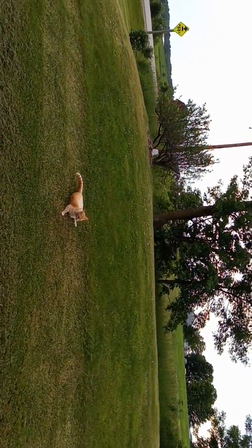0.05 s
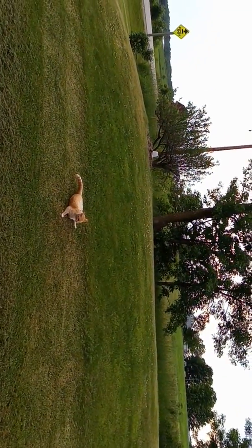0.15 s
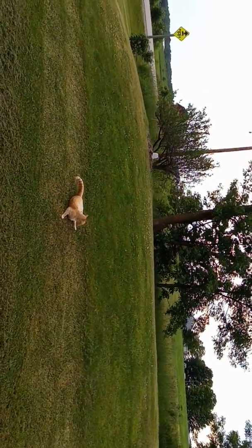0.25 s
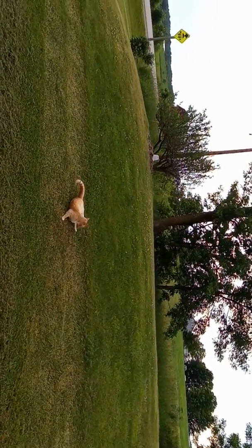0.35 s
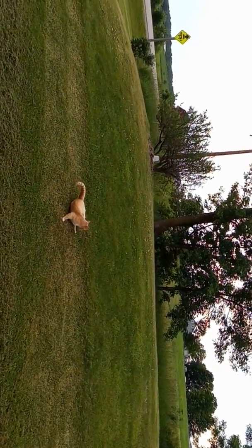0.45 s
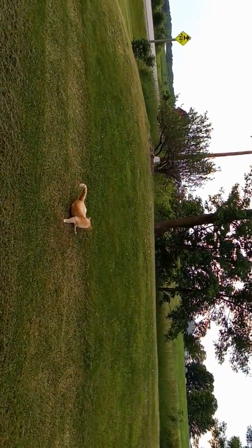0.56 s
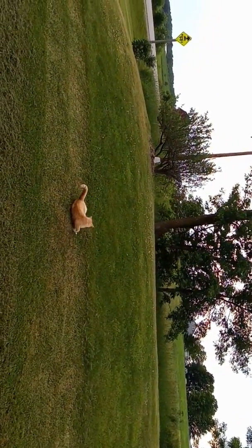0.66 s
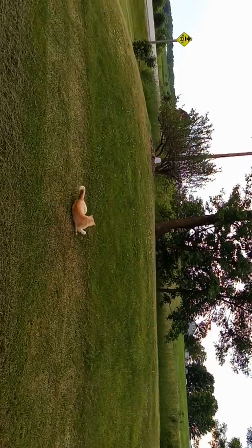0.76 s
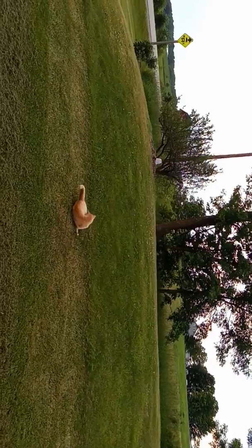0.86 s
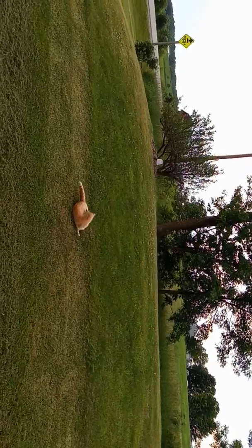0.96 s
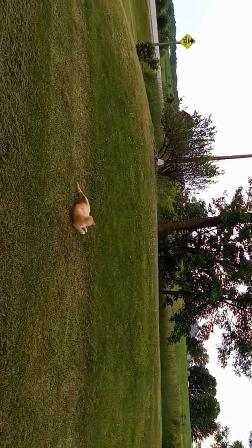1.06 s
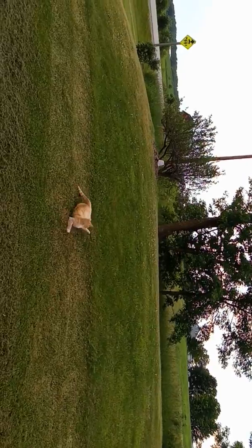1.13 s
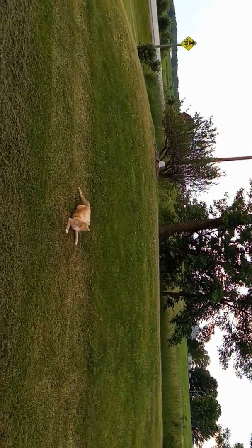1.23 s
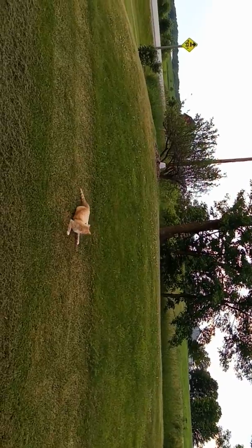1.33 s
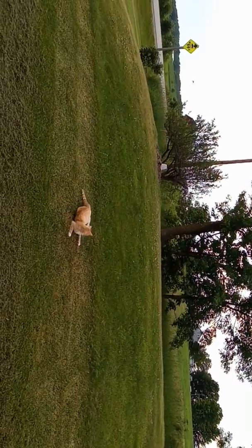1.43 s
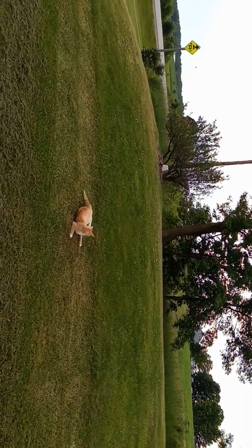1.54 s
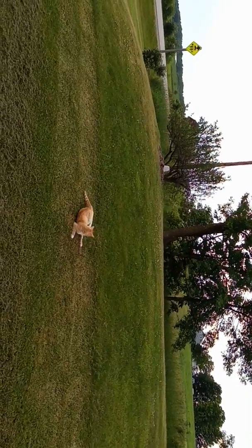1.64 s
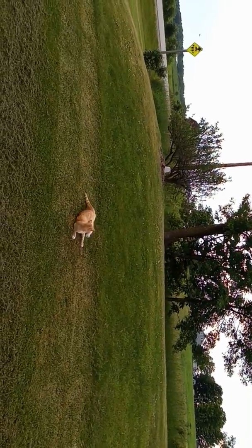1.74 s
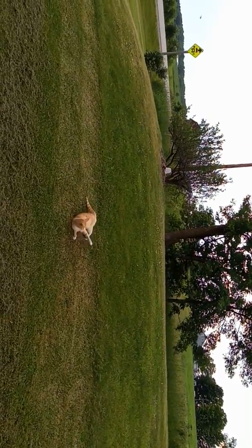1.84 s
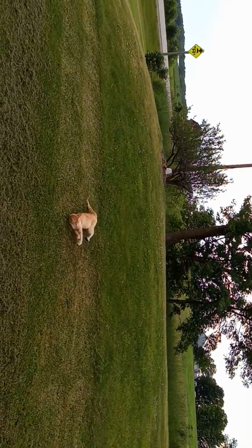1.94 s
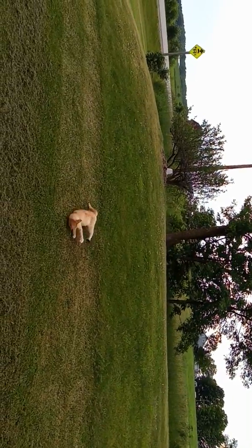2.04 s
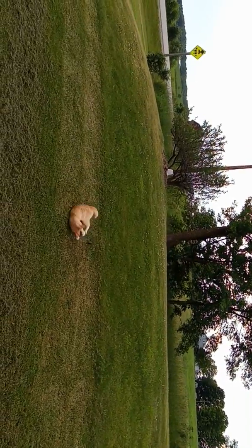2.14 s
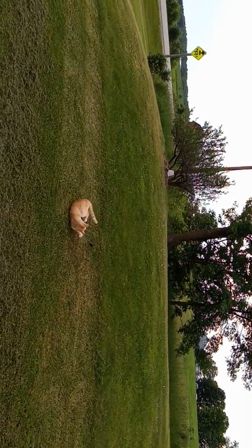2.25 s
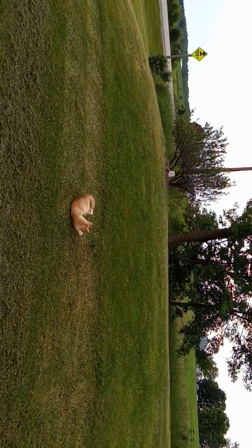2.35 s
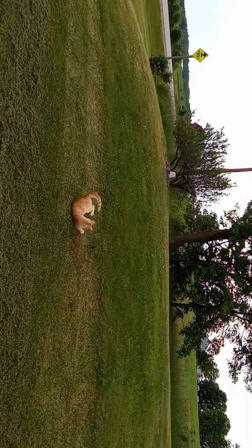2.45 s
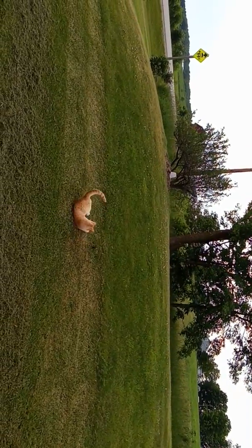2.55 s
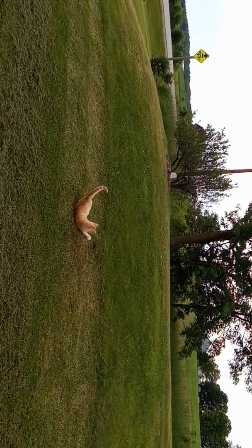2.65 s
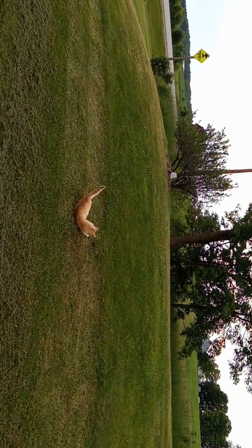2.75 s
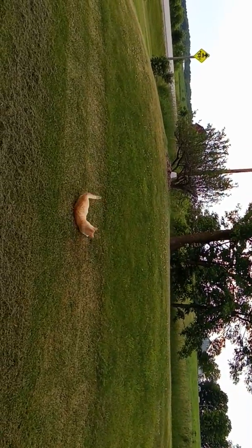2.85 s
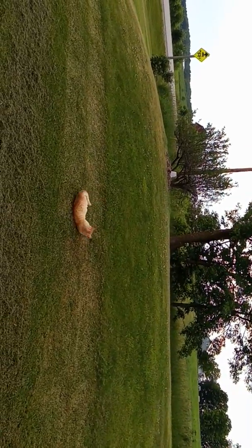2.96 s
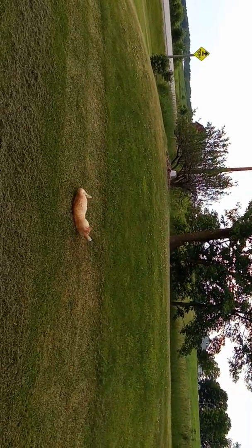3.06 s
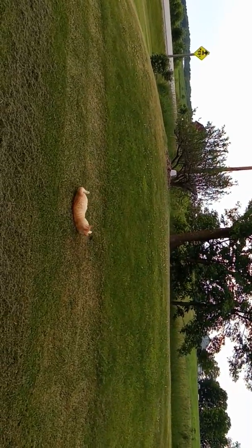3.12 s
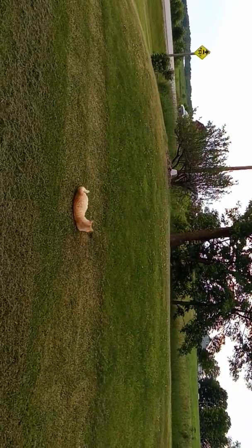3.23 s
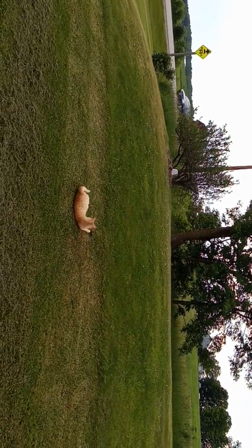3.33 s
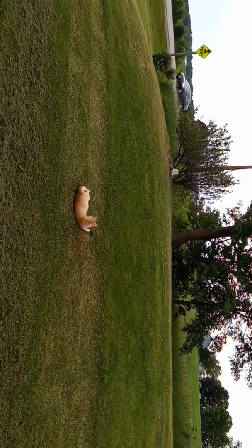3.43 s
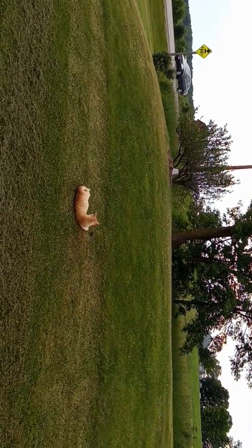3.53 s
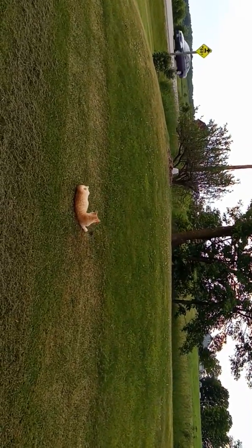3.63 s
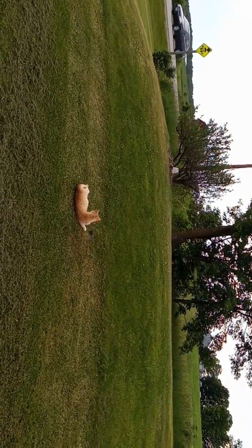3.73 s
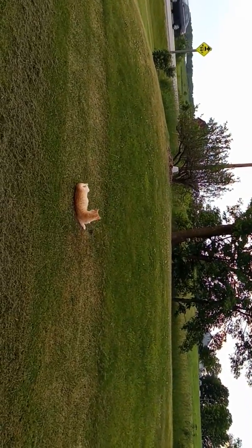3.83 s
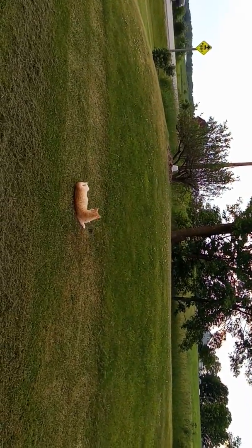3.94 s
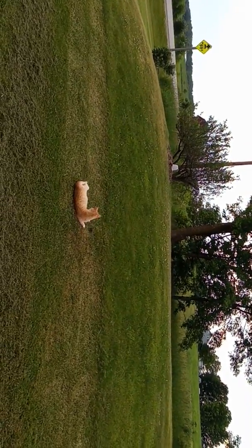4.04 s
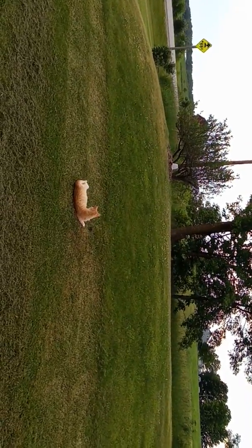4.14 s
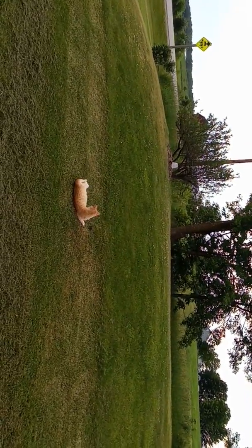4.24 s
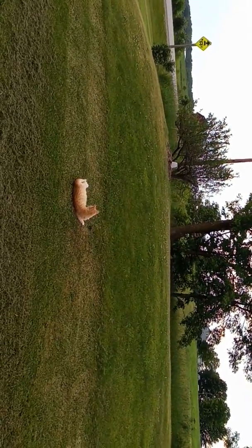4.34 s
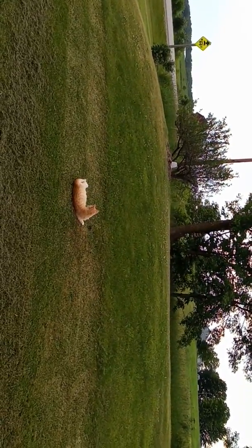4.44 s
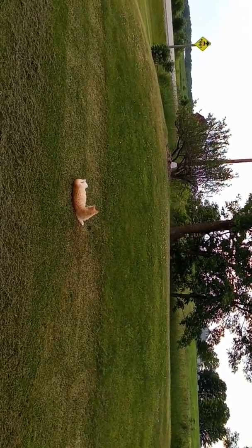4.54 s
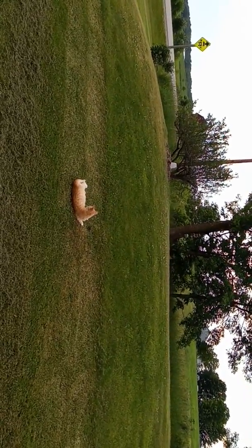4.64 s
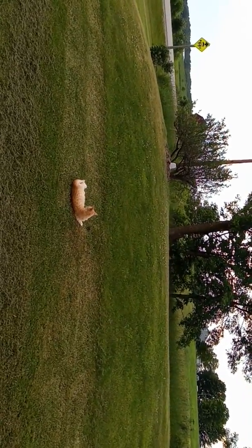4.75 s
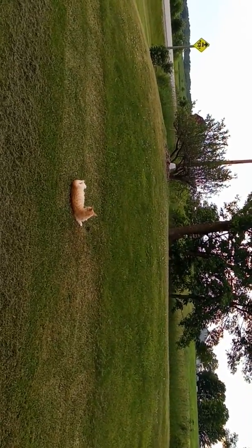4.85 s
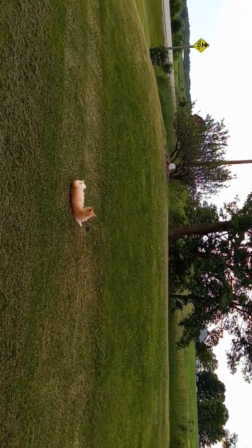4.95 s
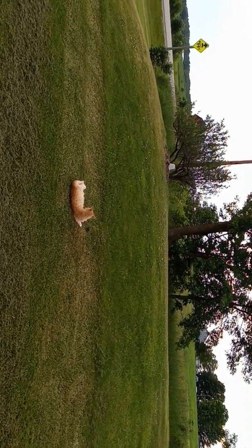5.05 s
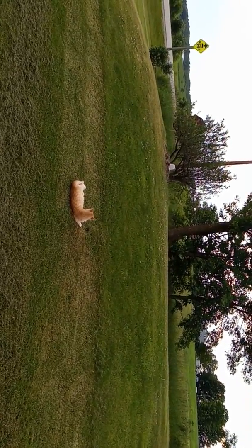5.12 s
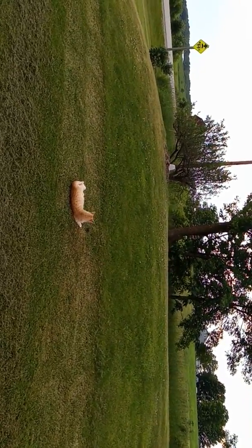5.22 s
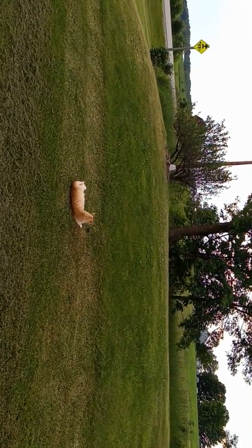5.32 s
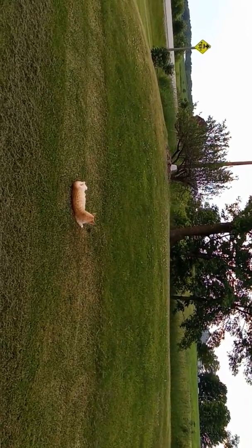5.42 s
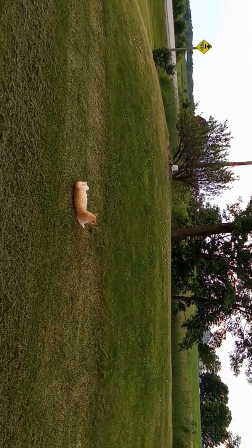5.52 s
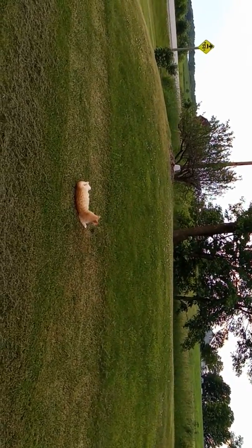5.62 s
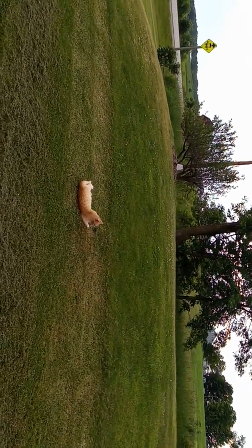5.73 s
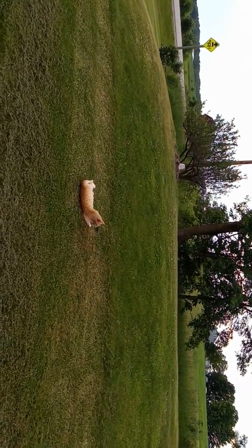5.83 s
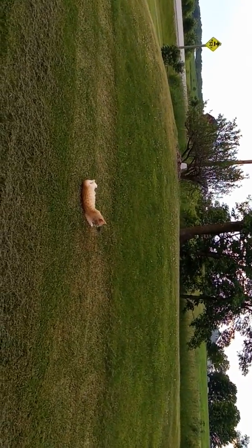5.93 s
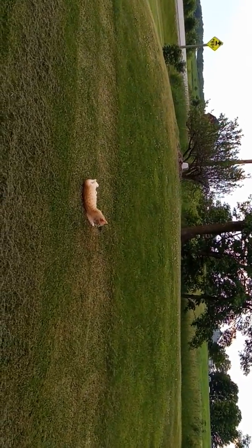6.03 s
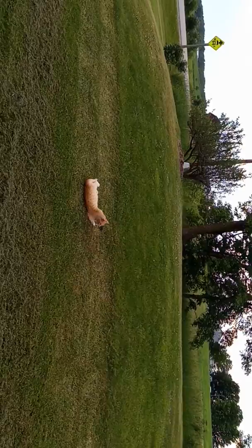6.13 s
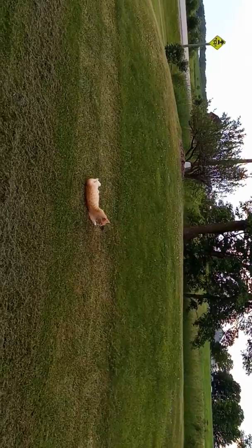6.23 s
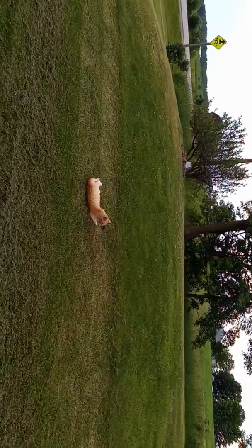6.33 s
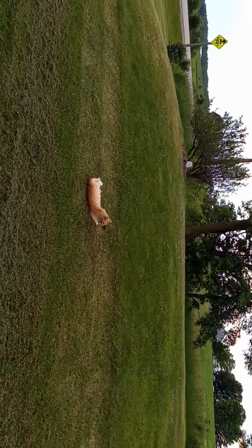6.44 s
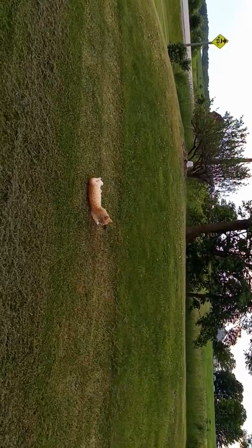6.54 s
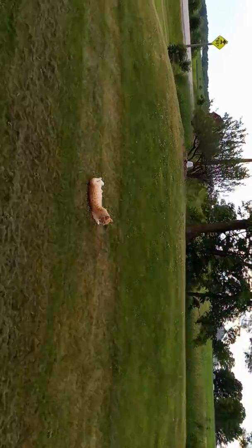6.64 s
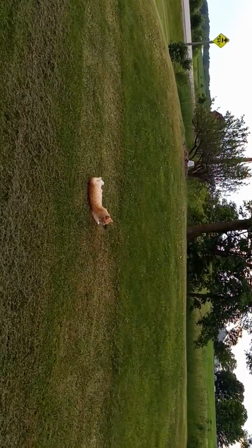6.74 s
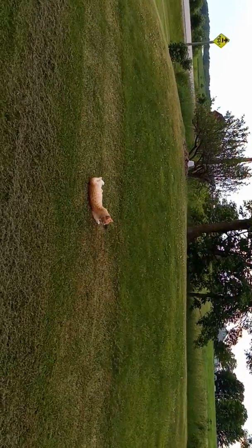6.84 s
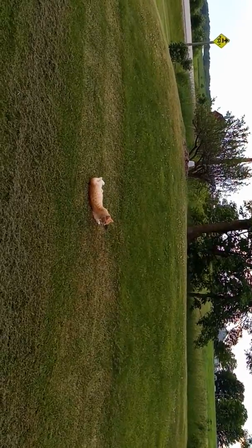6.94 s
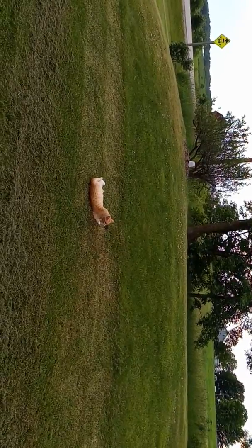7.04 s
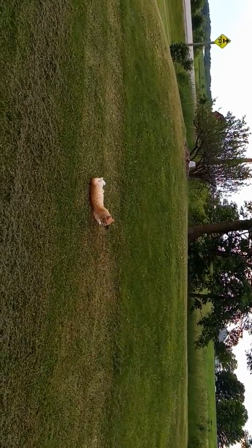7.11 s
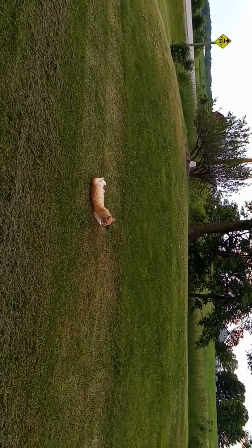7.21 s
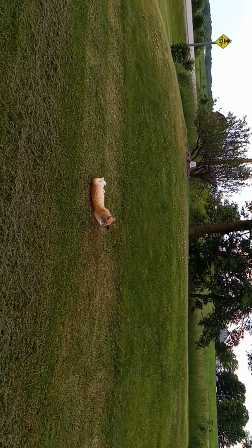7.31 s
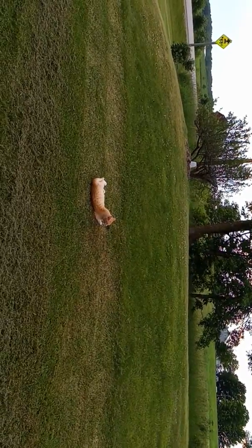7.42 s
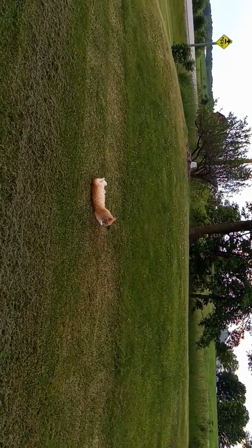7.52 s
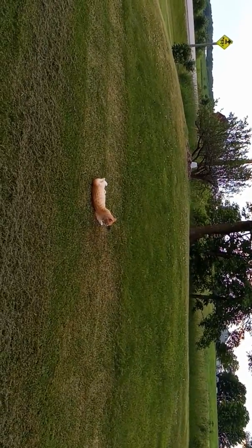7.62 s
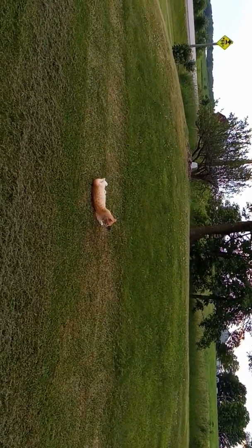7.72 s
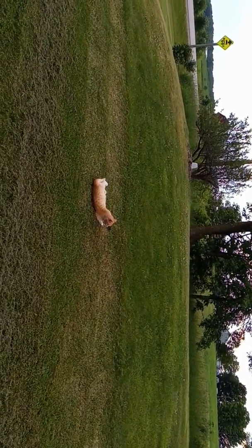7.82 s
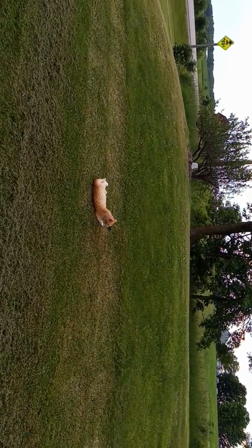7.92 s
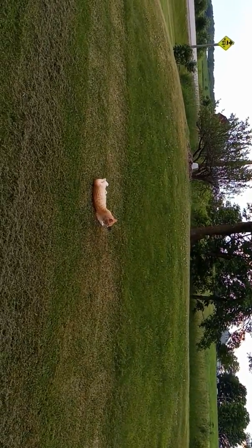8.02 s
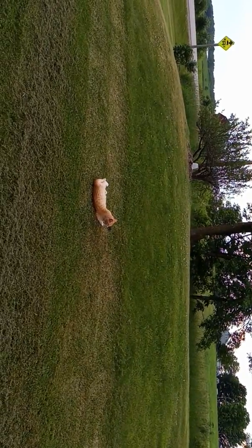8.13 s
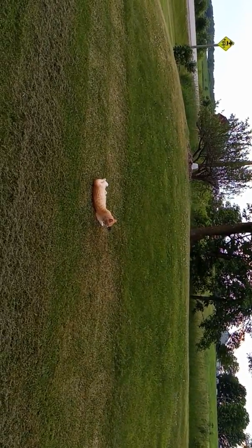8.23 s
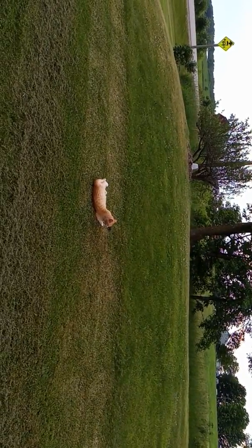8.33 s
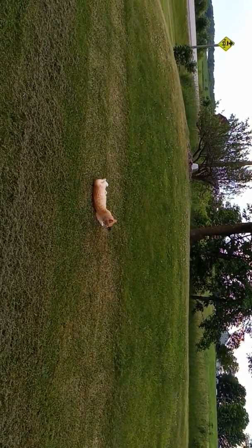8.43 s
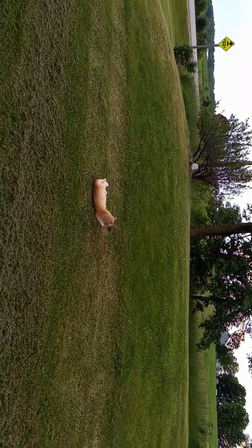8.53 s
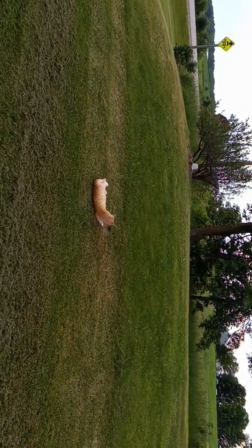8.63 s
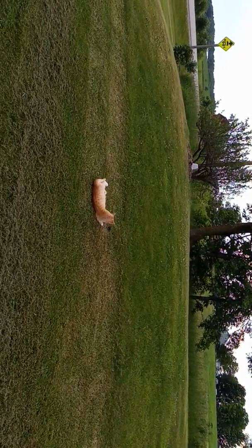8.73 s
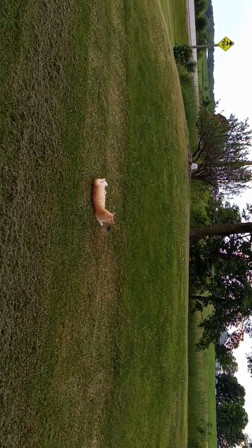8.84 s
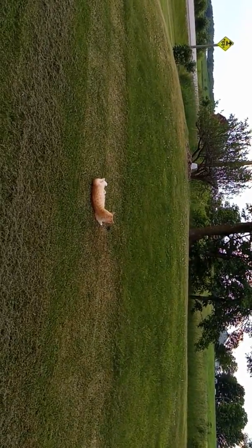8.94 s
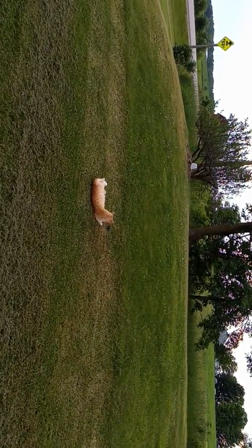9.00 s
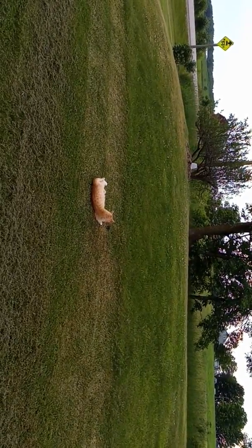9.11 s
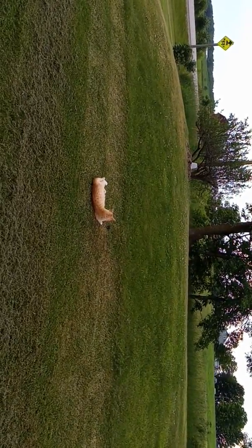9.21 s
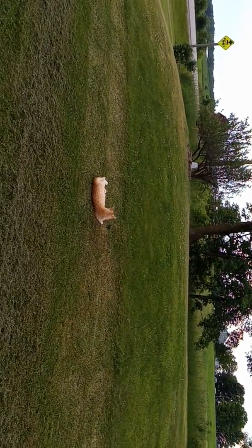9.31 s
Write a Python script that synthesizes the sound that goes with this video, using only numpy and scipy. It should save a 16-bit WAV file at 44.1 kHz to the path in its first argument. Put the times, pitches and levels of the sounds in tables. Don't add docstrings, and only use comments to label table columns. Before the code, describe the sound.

A car passes on a country road, its tyre roar swelling, peaking around five seconds and fading rightward, while small birds chirp and whistle.

```python
import sys
import numpy as np
from scipy import signal
from scipy.fft import rfft, irfft, next_fast_len
from scipy.io import wavfile
from scipy.ndimage import uniform_filter1d, map_coordinates

SR = 44100
rng = np.random.default_rng(int(sys.argv[2]) if len(sys.argv) > 2 else 0)


def transcribe(u):
    v = np.clip(np.atleast_2d(u).T, -1, 1)
    q = np.round(v * 32767).astype(np.int16)
    wavfile.write(sys.argv[1], SR, q)


def how_loud(loudness_db):
    steps = np.asarray(loudness_db, float) / 20
    return 10 ** steps


N = 413216

LAYER_HZ = [130, 800, 2000, 6500]
# (time [s], level [dB per Hz])
ROAR = [(0, -86), (.6, -85.5), (1.1, -82.5), (1.7, -81), (2.3, -81.5), (2.7, -79), (3.1, -77.5), (3.5, -78),
        (3.9, -76.5), (4.4, -75), (4.8, -75.5), (5.2, -73.5), (5.7, -74), (6.2, -79.5), (6.7, -84),
        (7.3, -88.5), (8.2, -93), (9.37, -101)]
NEAREST_S, SPREAD_S = 4.64, 0.75
RUMBLE_DB, RUMBLE_FALL = -66.5, 1.42
HUM_DB, SIZZLE_DB = 2.5, -11
SIZZLE_FOLLOWS = 0.24
HEDGE_END_S, HEDGE_FADE_S, HEDGE_DB = 3.31, 0.04, -7.5
AIR_LOSS = 0.72
# (time [s], width [s], level [dB])
TRUNKS = [
    (4.68, 0.12, -0.5),
    (5.56, 0.057, -3.5),
    (6.42, 0.16, -1.5),
]
# (time [s], width [s], level [dB])
TREAD_SWELLS = [
    (.35, 0.35, 7.5),
    (2.35, 0.28, 7),
    (3.4, 0.16, -1),
    (4.25, 0.42, 11),
    (6.8, 0.041, 4.5),
]
# (time [s], width [s], level [dB])
HUM_SWELLS = [
    (3.0, 0.29, 4.5),
    (4.85, 0.13, 2),
    (6.2, 0.39, 5),
    (7.3, 0.3, 4),
    (8.4, .4, -1),
    (9.2, 0.28, -4.5),
]
# (time [s], width [s], level [dB])
SIZZLE_SWELLS = [
    (1.15, 0.2, 4.2),
    (2.4, 0.35, 4.9),
    (3.55, 0.21, 2),
]

# (frequency [Hz], level about the roar [dB], left minus right [dB])
AHEAD = [(35, -11.5, 5), (121, 6, -1.5), (244, -23, 5.5), (446, -10.5, 0), (805, -7, 1.5), (1073, 0, 3),
         (1250, -6.5, 3), (1817, 3, 7), (2770, -7, 6.5), (3280, -7, 7.5), (4400, -6.5, 0.5),
         (5270, -22.5, -28.5), (6800, 2.1, 11.5), (10300, -18.5, 29)]
# (frequency [Hz], level about the roar [dB], left minus right [dB])
NEARER = [(35, -13, -5), (115, 6, 0.5), (234, -17.5, 0), (400, -12, -1), (730, -4.5, 1), (1102, 0.5, 1.7),
          (1300, -3.6, 10), (1900, -4, 5), (2610, -5, 8.5), (3300, -8, 3), (4300, -4, 2), (5300, -16, -15),
          (6700, 1, 10), (9550, -5, -6)]
# (frequency [Hz], level about the roar [dB], left minus right [dB])
CLOSING = [(35, -19, 2), (113, 1.5, -1.5), (213, -2.5, 1), (392, -16.5, 5), (626, 0, -2), (1060, -1, 4.5),
           (1310, 1.5, 4.5), (1920, -1.5, 9), (2560, -6, 6), (3060, -11, -5.5), (4450, -7, 4),
           (5300, -1, 1.5), (6700, 4, 10.5), (9150, -3.5, -6), (12500, 0.5, -4)]
# (frequency [Hz], level about the roar [dB], left minus right [dB])
ABREAST = [(35, -17, -8), (113, -1, -1), (229, -3, 0.5), (433, -13, 2), (640, -14.5, 3), (930, 3, 3.2),
           (1310, -1, -1.5), (1910, -1.5, 8), (2630, -4, 4), (3320, -8.5, -5.5), (4300, -7.5, -3),
           (5300, -1.5, 2), (6700, 0.5, 2), (9650, -4.5, -10)]
# (frequency [Hz], level about the roar [dB], left minus right [dB])
LEAVING = [(35, -14.5, -1), (114, 0.8, 3), (220, -1, -5), (405, -10, 3), (700, -12, 0), (1070, -13.5, -5.5),
           (1225, -4, 0), (1630, -3, -6.5), (2620, -0.5, 9), (3300, -4, 1), (4200, -3.5, 0.5),
           (5300, -8.5, -18), (6900, 2, 5.5), (9550, 5, 1.5), (12500, -1.5, -1)]
# (frequency [Hz], level about the roar [dB], left minus right [dB])
GONE = [(35, -16, -4), (128, 5, 0), (223, -5, 0.5), (333, -18.5, -8), (600, -17, -3), (712, -6, 3),
        (1130, -0.7, -10), (1390, -2, 2), (2030, 0.3, 6.5), (2620, -3, 2), (3240, -3.2, 3),
        (4530, -6.5, -8), (5300, -5.5, 1), (6660, -2, 6), (9500, -23, 17)]
COLOURS = [AHEAD, NEARER, CLOSING, CLOSING, ABREAST, LEAVING, LEAVING, GONE]
COLOUR_S = [2.0, 3.1, 3.6, 4.5, 5.1, 6.0, 6.6, 7.9]

# (time [s], lateness at the left port [ms])
LEFT_LATE = [(0.0, -0.045), (1.6, -0.029), (2.4, 0.016), (2.8, 0.045), (3.6, 0.186), (4.4, 0.408),
             (4.8, 0.472), (5.2, 0.481), (5.6, 0.44), (6.4, 0.354), (7.2, 0.305), (8.8, 0.297),
             (9.37, 0.27)]
SWAY_MS, SWAY_PER_S = .004, 2.5
# (frequency [Hz], likeness [0-1])
LIKENESS = [(30, .85), (100, .98), (300, .98), (1000, .95), (2600, .92), (3300, .96), (4300, .84),
            (6700, .87), (9000, .78), (12000, .5)]
# (time [s], scatter [1 = open view])
SCATTER = [(0, 2.5), (1, 1.5), (1.8, 2.2), (2.4, 1.2), (3.2, 2.4), (3.6, 1.1), (4.1, 1.2), (4.5, .8),
           (5.0, .7), (6.2, .8), (7, 1.8), (8, 3.5), (9.3, 5.0)]
# (frequency [Hz], phase [radians])
DETOUR = [(300, 0.5), (1000, .5), (1900, 1), (2600, -0.3), (3300, -0.37), (4200, -1.36), (5200, -4),
          (6600, -4.5), (8000, -4.5), (11000, -6.5)]
# (frequency [Hz], phase [radians])
OPEN_SIDE = [(300, 0.086), (1300, 0.25), (1900, -0.41), (2600, -0.5), (3300, -0.47), (4200, .4),
             (6600, 0.67), (8000, 0.28), (12000, .4)]
# (time [s], share [0-1])
STRAIGHT = [(4.55, 0), (4.95, 1), (5.45, 1), (5.75, 0)]
# (time [s], delay [ms], strength [0-1])
BOUNCE = [(0, 1.35, 0), (3.3, 1.44, 0.11), (3.9, 1.58, 0.67), (4.5, 1.32, 0.3), (5.0, 1.08, 0.33),
          (5.5, 1.24, 0.64), (6.2, 0.91, 0.9)]
BOUNCE_CUT_HZ = 1220

# (time [s], length [s], pitch [Hz], level [dB], left minus right [dB])
WHISTLES = [
    (2.292, .178, 5280, -45.5, 3.5),
    (2.692, .198, 5105, -48, 5.5),
    (3.088, .22, 5010, -45.5, 4.5),
]
# (time [s], pitch [Hz], level [dB])
WHISTLE_TICK = [(-.010, 4730, -17), (-.006, 6250, -12), (-.0045, 6560, -20), (-.004, 4800, -9),
                (0, 6260, -12), (.002, 4950, -23)]
ATTACK_S, HOLD_S, RELEASE_S = .012, .035, .012
FADE_DB_PER_S, EDGE_DB = 68, -7
ONSET_HZ, SAG_HZ, LIFT_HZ, SAG_S = 110, 70, 95, .08
# (time [s], level [dB], pitch factor [1], left minus right [dB], left lateness [ms])
CHIRPS = [
    (0.303, -56.5, 1.03, -3, -0.04),
    (1.401, -53.5, 1.03, -1, -0.04),
    (2.319, -58, 1.0, -3, -0.033),
    (6.065, -50.5, 1.03, 0, -0.039),
    (6.458, -54.5, 1.03, -4, -0.036),
    (7.480, -50.5, 1.04, -2, -0.038),
]
# (time [s], length [s], first pitch [Hz], middle pitch [Hz], last pitch [Hz])
LEAD_IN = [(-.034, .014, 5700, 5900, 5700), (-.010, .011, 5500, 5600, 6500)]
# (time [s], length [s], first pitch [Hz], middle pitch [Hz], last pitch [Hz])
LOW_VOICE = [(0, .030, 3300, 4230, 3600), (.049, .015, 3250, 3600, 4300), (.062, .016, 4100, 3300, 3800)]
# (time [s], length [s], first pitch [Hz], middle pitch [Hz], last pitch [Hz])
HIGH_VOICE = [(.003, .022, 4000, 4650, 4400), (.027, .008, 3650, 4400, 4700),
              (.031, .010, 4300, 3700, 3300), (.046, .014, 3500, 3950, 4100),
              (.082, .006, 3700, 3400, 3100)]
LEAD_IN_DB, LOW_VOICE_DB, HIGH_VOICE_DB, STROKE_EDGE_DB = -12, -1, -6.5, -5
# (time [s], length [s], top pitch [Hz], level [dB])
ARCHES = [
    (2.220, .022, 4600, -65),
    (7.858, .022, 4180, -74),
    (8.390, .040, 4500, -69),
    (8.465, .027, 3850, -70),
]
# (time [s], length [s], top pitch [Hz], level [dB])
FALLS = [
    (3.592, .024, 5250, -53),
    (4.105, .015, 5260, -57),
    (4.288, .015, 5200, -59),
]
ARCH_FROM, ARCH_TO, FALL_MIDDLE, FALL_TO = .92, .82, .86, .68
# (time [s], length [s], pitch [Hz], level [dB])
PEEP = (3.495, .022, 7800, -52)
# (delay [s], level [dB])
ECHOES = [(.009, -19), (.016, -20), (.034, -21), (.052, -21), (.084, -20), (.108, -24), (.131, -24),
          (.17, -27)]

# (frequency [Hz], level [dB per Hz], left minus right [dB])
COUNTRY = [(35, -99.9, 5), (120, -80.5, -2.5), (218, -99.6, -4), (400, -111.4, 9), (680, -106.2, -12),
           (1030, -96.5, -3.5), (1310, -91, -2.5), (1860, -98, -6), (2580, -93.5, 12), (3270, -102.7, -2.5),
           (4300, -108.1, -9), (5300, -110.4, -17), (6700, -111.4, -8), (9500, -110.2, 4)]
# (frequency [Hz], level [dB])
MIC = [(300, -0.5), (740, -5), (850, -1.5), (1030, 1.5), (1300, -3.5), (1520, 0.5), (7000, -2),
       (7700, -4.5), (8400, -14.5), (9500, -19.5), (12000, -29), (13800, -29), (15000, -18.5)]
# (frequency [Hz], level as white noise [dB])
HISS = [(6000, -92), (9000, -91.5), (13500, -86.5), (15000, -76.5)]
TOP_HZ = 15500


def car():
    t, now = np.arange(N // 256 + 2) * 256 / SR, np.arange(N) / SR
    levels = layers(t)
    shared, own = np.zeros((2, N)), np.zeros((2, N))
    gust = drift(6.9, t)
    scatter = np.interp(t, *np.transpose(SCATTER))
    for hz, noise in bands(channels=3):
        mix = [np.interp(np.log(hz), np.log(LAYER_HZ), row) for row in np.eye(4)]
        colour = np.interp(t, COLOUR_S, [at_hz(rows, hz) for rows in COLOURS])
        lean = np.interp(t, COLOUR_S, [at_hz(rows, hz, order=2) for rows in COLOURS])
        patches = 1.09 * (0.44 * gust + drift(9.8, t))
        air_share = np.clip(np.log2(hz / 7500) * 3, 0, 1)
        air_db = AIR_LOSS * air_share * (levels[3] - levels[3].max() + 1.0)
        level_db = mix @ levels + colour + patches + air_db
        alike = np.clip(at_hz(LIKENESS, hz), .01, 1) ** scatter
        for c, side in enumerate((.5, -.5)):
            gain = how_loud(level_db + side * lean)
            shared[c] += np.interp(now, t, np.sqrt(alike) * gain) * noise[0]
            own[c] += np.interp(now, t, np.sqrt(1 - alike) * gain) * noise[1 + c]
    return np.array([left_path(shared[0], t, now), right_path(shared[1], now)]) + own


def layers(t):
    roar = np.interp(t, *np.transpose(ROAR)) + bumps(TRUNKS, t)
    rumble = RUMBLE_DB - RUMBLE_FALL * 10 * np.log10(1 + ((t - NEAREST_S) / SPREAD_S) ** 2)
    hum = roar + HUM_DB + bumps(HUM_SWELLS, t)
    tread = bumps(TREAD_SWELLS, t)
    hedge = HEDGE_DB / (1 + np.exp((t - HEDGE_END_S) / HEDGE_FADE_S))
    sizzle = roar + SIZZLE_DB + SIZZLE_FOLLOWS * tread + hedge + bumps(SIZZLE_SWELLS, t)
    return np.array([rumble, hum, roar + tread, sizzle])


def left_path(x, t, now):
    straight = np.interp(now, *np.transpose(STRAIGHT))
    bent = spectral(x, lambda hz: np.exp(1j * at_hz(DETOUR, hz)))
    direct = spectral(x, lambda hz: np.exp(1j * at_hz(OPEN_SIDE, hz)))
    late_ms = np.interp(t, *np.transpose(LEFT_LATE)) + SWAY_MS * drift(SWAY_PER_S, t)
    return delayed(straight * direct + (1 - straight) * bent, np.transpose([t, late_ms]))


def right_path(x, now):
    dull = spectral(x, lambda hz: 1 / (1 + (hz / BOUNCE_CUT_HZ) ** 4) / (1 + (400 / hz) ** 2))
    strength = np.interp(now, *np.transpose(BOUNCE)[::2])
    return x - strength * delayed(dull, BOUNCE)


def bumps(rows, t):
    return sum(db * np.exp(-.5 * ((t - s) / width) ** 2) for s, width, db in rows)


def drift(rate, t):
    r = np.exp(-2 * np.pi * rate * t[1])
    slow = signal.lfilter([1], [1, -2 * r, r * r], rng.standard_normal(len(t) + 500))[500:]
    return slow / slow.std()


def delayed(x, rows):
    s, ms = np.transpose(rows)[:2]
    late = np.interp(np.arange(N) / SR, s, ms) * SR / 1000
    return map_coordinates(x, [np.arange(N) - late], order=3, prefilter=True, mode="nearest")


def birds():
    out = np.zeros((2, N))
    whistling_bird(out)
    sparrow(out)
    stray_strokes(out)
    dry = out.copy()
    for s, echo_db in ECHOES:
        lags = (s * SR * rng.uniform(.9, 1.1, 2)).astype(int)
        for c, lag in enumerate(lags):
            out[c, lag:] += how_loud(echo_db) * dry[c, :-lag]
    return out


def whistling_bird(out):
    for s, length, hz, level_db, lean_db in WHISTLES:
        add(out, whistle(length, hz), s, level_db, lean_db=lean_db, late_ms=.01, third_db=-14)
        add(out, WHISTLE_TICK, s, level_db=-38, lean_db=lean_db)


def sparrow(out):
    voices = [(LEAD_IN, LEAD_IN_DB), (LOW_VOICE, LOW_VOICE_DB), (HIGH_VOICE, HIGH_VOICE_DB)]
    for s, level_db, pitch, lean_db, late_ms in CHIRPS:
        for voice, voice_db in voices:
            for row in voice:
                stroke_db = level_db + voice_db + rng.normal(0, 1.5)
                add(out, glide(*row), s, stroke_db, pitch, lean_db, late_ms, flutter_db=3.5)


def stray_strokes(out):
    for s, length, hz, level_db in ARCHES:
        arch = glide(0, length, ARCH_FROM * hz, hz, ARCH_TO * hz)
        add(out, arch, s, level_db, lean_db=3.0, flutter_db=7.0)
    for s, length, hz, level_db in FALLS:
        fall = glide(0, length, hz, FALL_MIDDLE * hz, FALL_TO * hz)
        add(out, fall, s, level_db, lean_db=-2.5, flutter_db=-1.0)
    s, length, hz, level_db = PEEP
    add(out, glide(0, length, hz, hz, hz), s, level_db, lean_db=-9.0)


def whistle(length, hz):
    faded = -FADE_DB_PER_S * (length - RELEASE_S - HOLD_S)
    lifted = hz - SAG_HZ + LIFT_HZ
    return [(0, hz + ONSET_HZ, EDGE_DB), (ATTACK_S, hz + ONSET_HZ / 4, -1),
            (HOLD_S, hz, 0), (SAG_S, hz - SAG_HZ, faded * .5),
            (length - RELEASE_S, lifted, faded), (length, lifted, faded - 10)]


def glide(s, length, first, middle, last):
    u = np.linspace(-1, 1, num=9)
    hz = middle + u * (last - first) / 2 + u ** 2 * ((first + last) / 2 - middle)
    return np.transpose([s + length * (u + 1) / 2, hz, STROKE_EDGE_DB * u ** 2])


def add(out, rows, start=0, level_db=0, pitch=1, lean_db=0, late_ms=0, third_db=-90, flutter_db=0):
    s, hz, db = np.transpose(rows)[:3]
    i = np.arange(int((start + s[0]) * SR), int((start + s[-1]) * SR))
    t = i / SR - start
    hz = uniform_filter1d(pitch * np.interp(t, s, hz), size=30)
    soft_ends = signal.windows.tukey(len(i), min(1, 200 / len(i)))
    shape = np.sqrt(2) * how_loud(level_db + np.interp(t, s, db)) * soft_ends
    wander = np.cumsum(rng.normal(0, 0.043, len(i)))
    burr = np.sin(2 * np.pi * 190.0 * t + rng.uniform(0, 3.0) + wander)
    shape *= how_loud(flutter_db * burr)
    turn = 2 * np.pi * np.cumsum(hz) / SR
    for c, side in enumerate((.5, -.5)):
        phase = turn - side * 2 * np.pi * hz * late_ms / 1000
        out[c, i] += shape * how_loud(side * lean_db) * (np.sin(phase) + how_loud(third_db) * np.sin(3 * phase))


def countryside():
    out = np.zeros((2, N))
    for hz, noise in bands(channels=3):
        alike = 1 / (1 + (hz / 700) ** 2)
        for c, side in enumerate((.5, -.5)):
            gain = how_loud(-4.5 + at_hz(COUNTRY, hz) + side * at_hz(COUNTRY, hz, order=2))
            out[c] += gain * (np.sqrt(1 - alike) * noise[c] + np.sqrt(alike) * noise[2])
    return out


def bands(channels):
    white = rng.standard_normal((2, channels, N)) * np.sqrt(SR / 2)
    edges = 24 * 2 ** np.arange(0, 9.6, .25)
    for k, (low, high) in enumerate(zip(edges, edges[1:])):
        sos = signal.butter(2, [low, high], "band", fs=SR, output="sos")
        yield np.sqrt(low * high), signal.sosfilt(sos, white[k % 2])


def at_hz(rows, hz, order=1):
    rows = np.array(rows)
    return np.interp(np.log(hz), np.log(rows[:, 0]), rows[:, order])


def spectral(x, response):
    size = next_fast_len(N + 4096)
    hz = np.arange(size // 2 + 1) * SR / size + 1e-3
    return irfft(rfft(x, size) * response(hz), size)[..., :N]


def scene():
    return car() + birds() + countryside()


def band_limit(x):
    return signal.sosfilt(signal.butter(12, 15680, fs=SR, output="sos"), x)


def record(dry):
    heard = spectral(dry, lambda hz: how_loud(at_hz(MIC, hz)) * (hz < TOP_HZ))
    white = rng.standard_normal(dry.shape)
    hiss = spectral(white, lambda hz: how_loud(at_hz(HISS, hz)) * (hz < TOP_HZ))
    return band_limit(heard + hiss)


dry = scene()
out = record(dry)
transcribe(out)
```